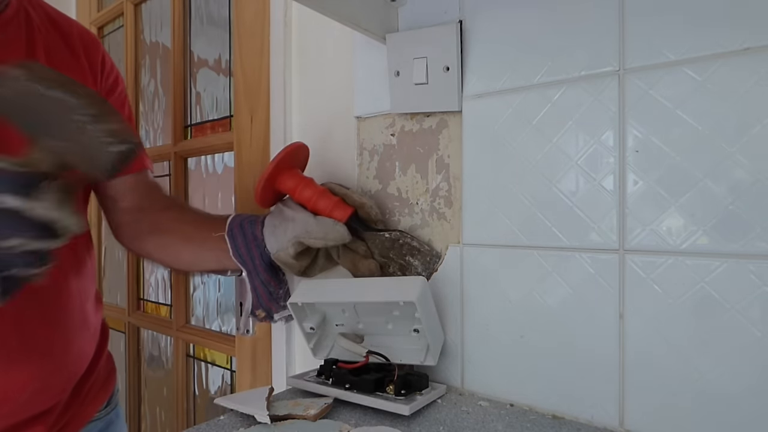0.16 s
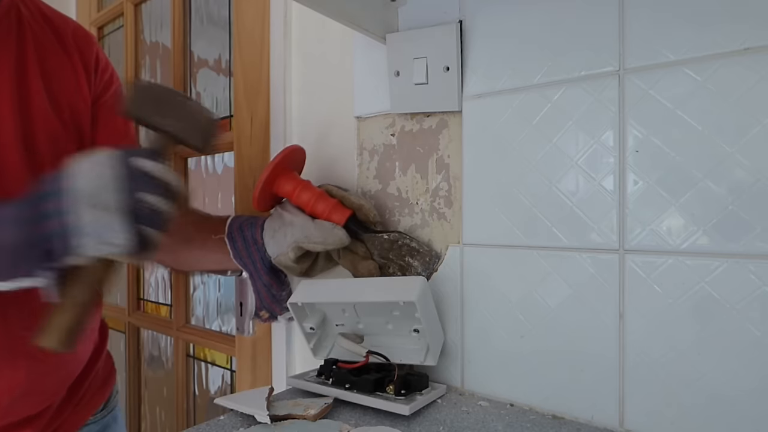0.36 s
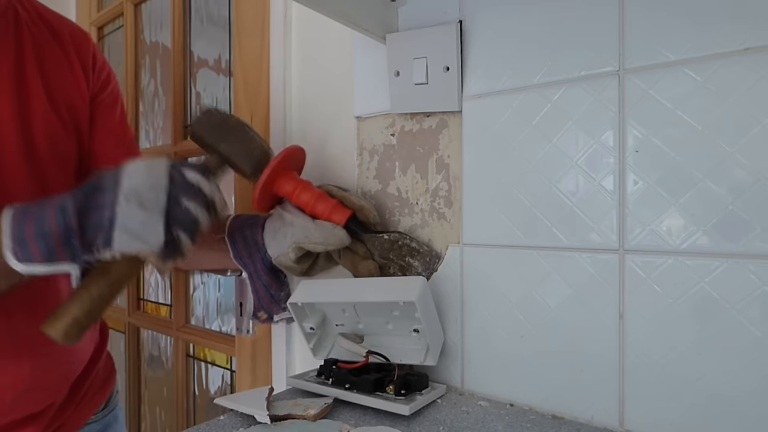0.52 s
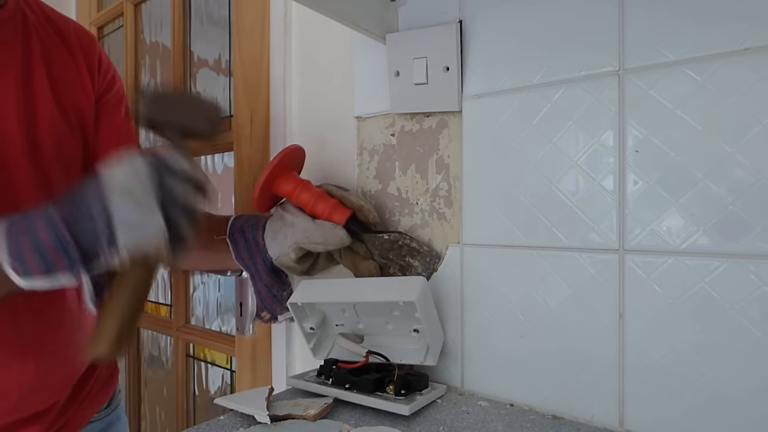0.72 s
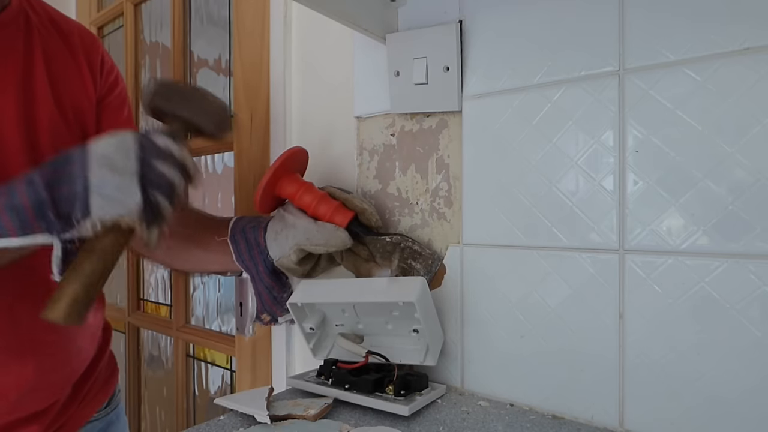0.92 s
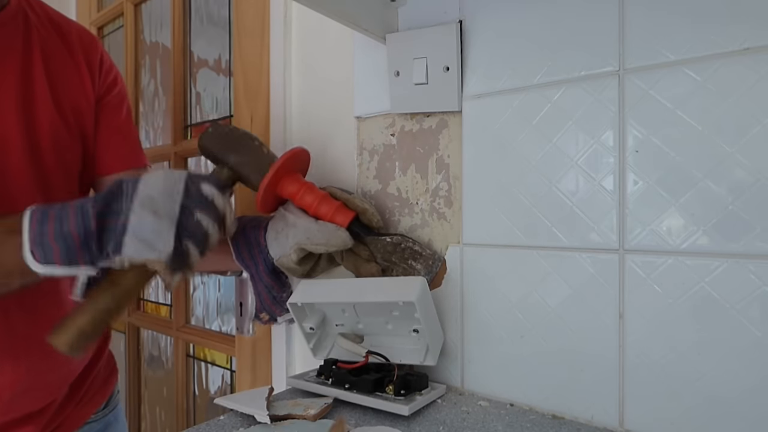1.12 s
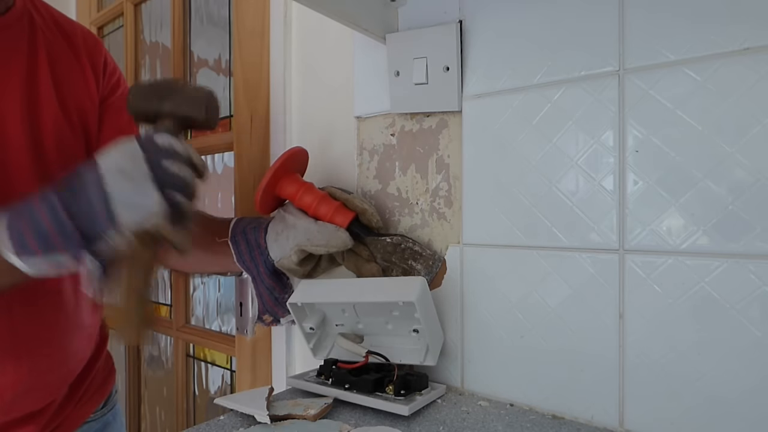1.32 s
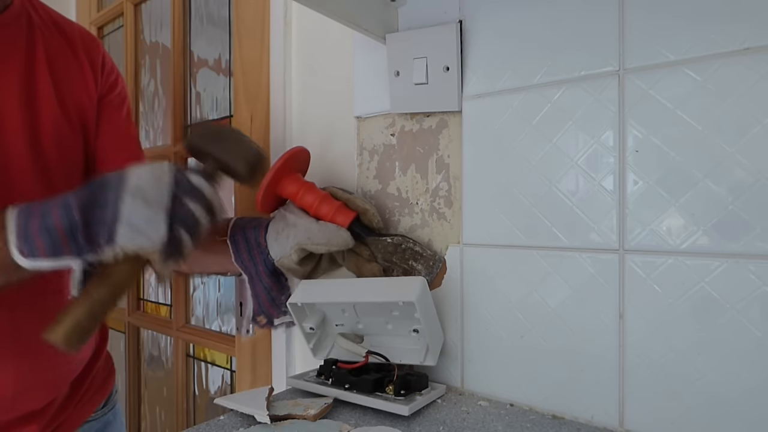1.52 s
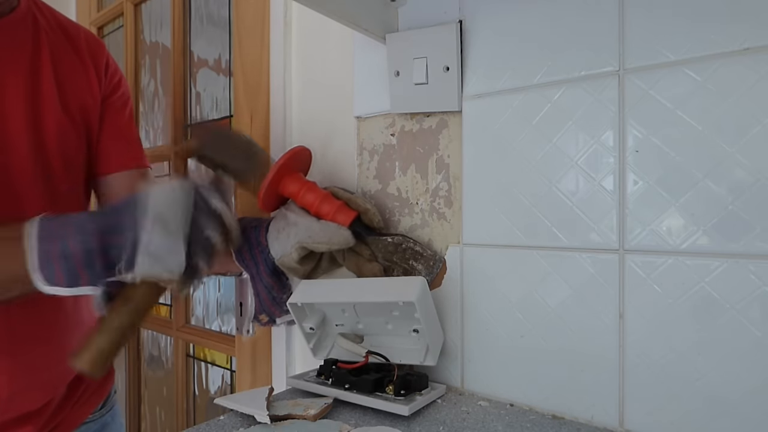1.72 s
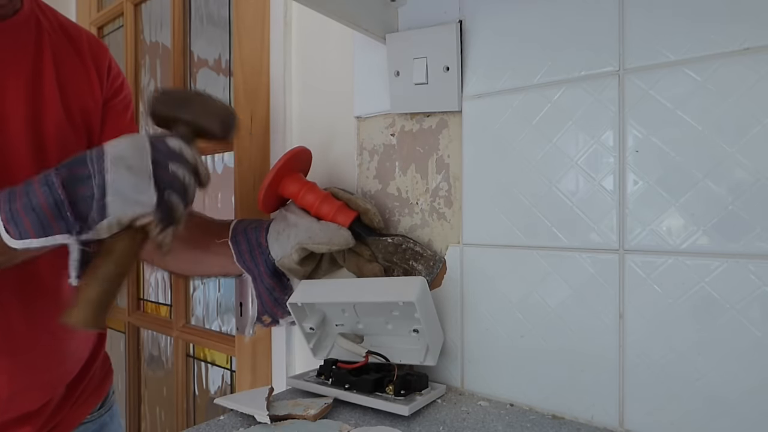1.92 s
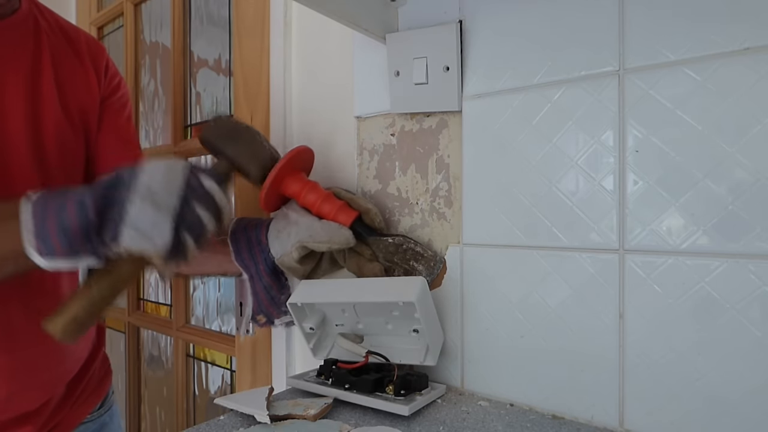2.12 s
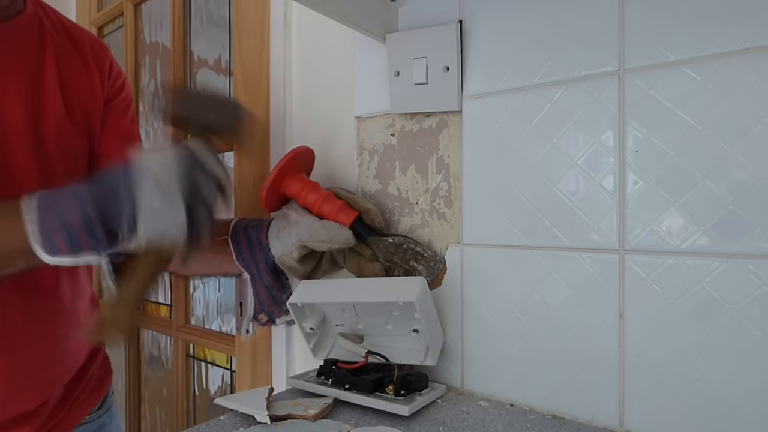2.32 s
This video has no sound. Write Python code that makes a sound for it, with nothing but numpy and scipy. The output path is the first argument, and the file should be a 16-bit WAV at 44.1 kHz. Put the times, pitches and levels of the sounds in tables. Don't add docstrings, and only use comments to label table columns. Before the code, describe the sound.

Loud metallic hammer blows on a chisel against ceramic tile, with small chips ticking on a worktop

```python
import sys
import numpy as np
from scipy import signal
from scipy.fft import rfft, irfft, next_fast_len
from scipy.io import wavfile
from scipy.ndimage import uniform_filter1d

SR = 44100
rng = np.random.default_rng(int(sys.argv[2]) if len(sys.argv) > 2 else 0)


def to_wav(s):
    ch = np.atleast_2d(s).T
    pcm = np.round(np.clip(ch, -1, 1) * 32767)
    wavfile.write(sys.argv[1], SR, pcm.astype(np.int16))


def invert_db(x):
    u = np.asarray(x, float) / 20
    return 10 ** u


N = 103635
SHORT = SR // 4


def along(points, hz):
    f, value = np.transpose(points)
    return np.interp(np.log(hz + 1), np.log(f + 1), value)


def filtered(x, response):
    n = x.shape[-1]
    padded = next_fast_len(n + 8192)
    spectrum = rfft(x, padded) * response(np.fft.rfftfreq(padded, 1 / SR))
    return irfft(spectrum, padded)[..., :n]


def hush(colour):
    mid, side = filtered(rng.standard_normal((2, N)), lambda hz: invert_db(along(colour, hz)))
    pair = np.array([mid + 0.5 * side, mid - 0.5 * side])
    return pair / pair.std()


def ring(modes, scatter_db, attack):
    t = np.arange(SHORT) / SR
    hz, db, t60 = np.transpose(sorted(modes))[:, :, None]
    sign = (-1) ** np.arange(len(modes))[:, None]
    scatter = scatter_db * rng.standard_normal((len(modes), 1))
    level = invert_db(db + scatter - 60 * t / t60)
    tones = sign * level * np.sin(2 * np.pi * hz * t)
    return tones.sum(0) * (1 - np.exp(-t / attack))


def noise_burst(t60):
    return invert_db(-60 * np.arange(SHORT) / SR / t60) * rng.standard_normal(SHORT)


def snap(t60, tilt_db):
    # pitch in Hz, level in dB.
    tile_colour = [(290, -19), (500, 8.5), (1360, -43.5), (2070, 10), (2610, 0), (7860, 10), (8580, 10),
                   (16000, -18)]
    return filtered(noise_burst(t60),
                    lambda hz: invert_db(along(tile_colour, hz) + tilt_db * np.log2(hz / 5000 + 0.086)))


def tail(room_db):
    # pitch in Hz, time to fade by 60 dB in s.
    room_fade = [(100, 0.86), (400, .6), (1500, 0.69), (4000, 0.63), (8000, 0.65), (14000, 0.47)]
    # pitch in Hz, level in dB.
    room_colour = [(100, -4), (400, 1), (1500, 2), (4000, 1), (8000, -5), (14000, -1)]
    # pitch in Hz, side over mid in dB.
    room_width = [(60, -18), (110, -13), (200, -21), (380, -14), (700, -8), (1290, -4), (2380, -9.5),
                  (4400, -8.5), (8120, -7), (15000, -3)]
    # pitch in Hz, width in Hz, boost in dB.
    standing_waves = [(136, 19, 4), (291, 20, 7.5), (427, 14, 5), (523, 22, 5)]
    delay_s, rise_s = 0.001, 0.002

    hz, t, z = signal.stft(rng.standard_normal((2, SR)), SR, nperseg=256)
    colour = along(room_colour, hz) + np.array([0 * hz, along(room_width, hz)])
    fading = z * invert_db(colour[:, :, None] - 60 * t / along(room_fade, hz)[:, None])
    echoes = signal.istft(fading, SR, nperseg=256)[1][:, :SR]

    def boost(f):
        return 1 + sum((invert_db(db) - 1) / (1 + (2 * (f - centre) / width) ** 2)
                       for centre, width, db in standing_waves)

    echoes = filtered(echoes, boost)
    since_first_echo = np.clip(np.arange(SR) / SR - delay_s, 0, 1)
    return echoes * (1 - np.exp(-since_first_echo / rise_s)) * invert_db(room_db - 33.5)


def add(out, s, sound, room_db, blur_hz=740, side_db=0):
    # pitch in Hz, side over mid in dB.
    near_width = [(60, -22), (110, -39), (200, -8), (380, -14), (700, 0), (1290, 3), (2380, -11),
                  (4400, -10), (8120, -13), (15000, -11)]
    path = tail(room_db)
    path[0, 0] += 1
    spread = noise_burst(0.0014)
    spread = spread / np.linalg.norm(spread)
    path[1, :SHORT] += filtered(spread, lambda hz: invert_db(along(near_width, hz)))

    power = np.abs(rfft(sound)) ** 2
    blurred = np.sqrt(np.abs(uniform_filter1d(power, round(blur_hz * len(sound) / SR))))
    pitches = np.fft.rfftfreq(len(sound), 1 / SR)
    wash = filtered(tail(room_db + 3.5), lambda hz: np.interp(hz, pitches, blurred))

    mid, side = signal.fftconvolve(sound[None], path, axes=1)[:, :SR] + wash
    side = side * invert_db(side_db)
    start = round(s * SR)
    out[:, start:][:, :SR] += np.array([mid + side, mid - side])[:, :N - start]


def air():
    # pitch in Hz, level in dB.
    air_colour = [(15, -30), (60, -1), (120, 0), (300, -4.5), (800, -4), (2500, -18), (8000, -13),
                  (12500, -18.5), (15000, -46)]
    return invert_db(-56) * hush(air_colour)


def scuff():
    # pitch in Hz, level in dB.
    scuff_colour = [(180, -34), (300, -7), (527, 0.5), (800, -10.5), (1700, -7), (2670, -20), (14000, -24)]
    start_s, length_s, level_db = 0.044, 0.18, -43.5
    progress = np.clip((np.arange(N) / SR - start_s) / length_s, 0, 1)
    return invert_db(level_db) * np.sin(np.pi * progress) * hush(scuff_colour)


def knocks():
    # start in seconds, peak level in dB, click level in dB.
    touches = [(0.049, -28.5, -18), (0.059, -30, -27), (0.075, -35.5, -30), (0.099, -42, -30),
               (0.1545, -15.5, -23), (0.163, -27, -25), (0.181, -26, -26), (0.188, -26, -33),
               (0.196, -27.5, -30), (0.213, -34, -25), (0.245, -37.5, -30), (0.325, -39, -13),
               (1.142, -24.5, -6), (1.156, -24.5, -17)]
    # pitch in Hz, level in dB, time to fade by 60 dB in s.
    panel_modes = [(157, -11, 0.043), (305, -5.5, 0.037), (419, -3.5, 0.03), (576, 3, 0.019),
                   (758, -3, 0.022), (977, -7, 0.012), (1400, -3, 0.0079), (2080, -4, 0.0076)]
    out = np.zeros((2, N))
    for s, db, click_db in touches:
        knock = ring(panel_modes, scatter_db=3.0, attack=0.0027)
        click = invert_db(click_db) * snap(0.032, tilt_db=-7)
        add(out, s, invert_db(db) * (knock + click), room_db=-14.5, blur_hz=160, side_db=-5)
    return out


def chips():
    # start in seconds, peak level in dB, pitch in Hz, time to fade by 60 dB in s.
    landings = [(0.8520, -12.5, 7040, 0.0088), (0.848, -13, 9000, 0.018), (1.0062, -18.5, 8950, 0.0072),
                (1.0251, -14, 8030, 0.012), (1.1095, -20.5, 8310, 0.015), (1.1422, -21.5, 5920, 0.016)]
    # pitch as a multiple of the chip's own, level in dB.
    chip_partials = [(.3, -13), (.74, -5), (0.999, 0.5), (1.17, -2.5), (1.4, -8.5)]
    out = np.zeros((2, N))
    for s, db, hz, t60 in landings:
        modes = [(hz * ratio, level, t60) for ratio, level in chip_partials]
        tick = ring(modes, scatter_db=2.5, attack=0.00069)
        add(out, s, invert_db(db) * (tick + 0.5 * snap(0.015, tilt_db=1.4)), room_db=-4.5)
    return out


def shard():
    # pitch in Hz, level in dB, time to fade by 60 dB in s.
    shard_modes = [(968, -14.5, 0.23), (1340, -6.5, 0.38), (1935, 2.5, 0.16), (2290, -23, 0.088)]
    settle_s, choke_t60 = 0.084, 0.03
    out = np.zeros((2, N))
    since_flat = np.clip(np.arange(SHORT) / SR - settle_s, 0, 1)
    ringing = ring(shard_modes, scatter_db=0.8, attack=0.0036) * invert_db(-60 * since_flat / choke_t60)
    add(out, 1.025, invert_db(-26.5) * ringing, room_db=-11, blur_hz=160)
    return out


def hammer():
    # start in seconds, peak level in dB, wall thud in dB, brightness in dB per octave, room level in dB.
    blows = [(0.4999, -6.5, -4.5, -5, -10.5), (0.8278, -8.5, -7.5, -1.5, -9.5),
             (1.1616, -6, -7, 1.3, -10.5), (1.4660, -7, -7, 1.45, -9), (1.7942, -7.5, -6, 2.4, -10.5),
             (2.1031, -9, -10, 1.7, -8.5)]
    # first pitch in Hz,
    # its level in dB, its time to fade by 60 dB in s, second pitch in Hz, its level in dB.
    favoured = [(5700, 0.5, 0.0099, 2050, -2.5), (6510, 2, 0.012, 10000, 4.5), (8410, 2, 0.03, 4795, -1),
                (8510, 4.5, 0.021, 1916, -4.5), (7070, 5.3, .012, 1942, -1.5), (5250, -1, 0.016, 1755, -6)]
    # pitch in Hz, level in dB, time to fade by 60 dB in s.
    steel_modes = [(1997, -4, 0.013), (3120, -6, 0.0064), (3860, -0.5, 0.011), (4990, 3.5, 0.0063),
                   (6155, -1, 0.008), (7050, -0.5, 0.01), (8450, 5, 0.0037), (10680, -0.5, 0.0035),
                   (13200, -5, 0.011), (15200, -44, 0.0025)]
    # pitch in Hz, level in dB, time to fade by 60 dB in s.
    wall_modes = [(138, -13.5, 0.059), (284.4, -5.5, 0.037), (463.4, -2.5, 0.019), (816, 3, 0.0093),
                  (1333, -5.5, 0.033)]
    out = np.zeros((2, N))
    for blow, extra in zip(blows, favoured):
        s, db, thud_db, tilt_db, room_db = blow
        first_hz, first_db, first_t60, second_hz, second_db = extra
        modes = [(hz, level + tilt_db * np.log2(hz / 5000), t60) for hz, level, t60 in steel_modes]
        modes += [(first_hz, first_db, first_t60), (second_hz, second_db, 0.017)]
        steel = ring(modes, scatter_db=1.5, attack=0.00013)
        thud = invert_db(thud_db) * ring(wall_modes, scatter_db=1.0, attack=0.00095)
        tile = invert_db(0.5) * snap(0.016, tilt_db)
        add(out, s, invert_db(db) * (steel + thud + tile), room_db)
    return out


def scene():
    return air() + scuff() + knocks() + chips() + shard() + hammer()


def band_limit(x):
    return signal.sosfilt(signal.butter(12, 16570, fs=SR, output="sos"), x)


def record(dry):
    bass_cut_hz, top_hz, ceiling, hardness = 83, 16500, 1.0, 3
    x = filtered(dry, lambda hz: (1j * hz / (bass_cut_hz + 1j * hz)) ** 2)
    x = x / (1 + np.abs(x / ceiling) ** hardness) ** (1 / hardness)
    mix = filtered(x, lambda hz: hz < top_hz) - 0.0029
    return band_limit(mix)


dry = scene()
out = record(dry)
to_wav(out)
```